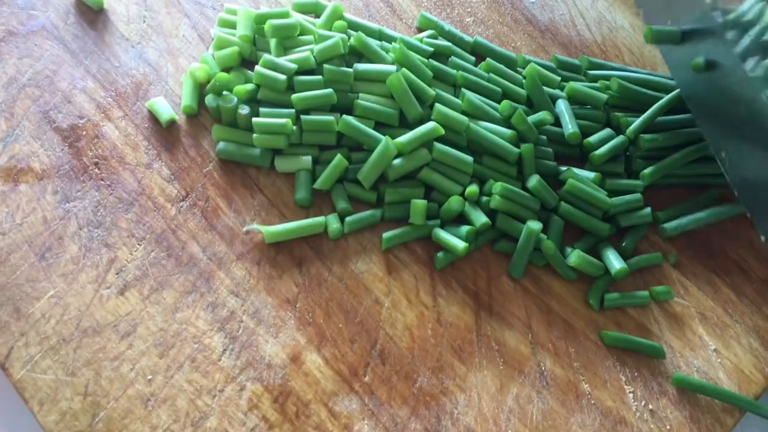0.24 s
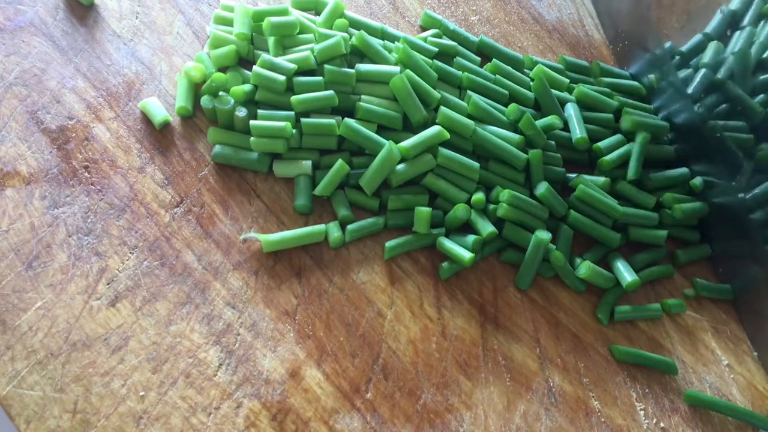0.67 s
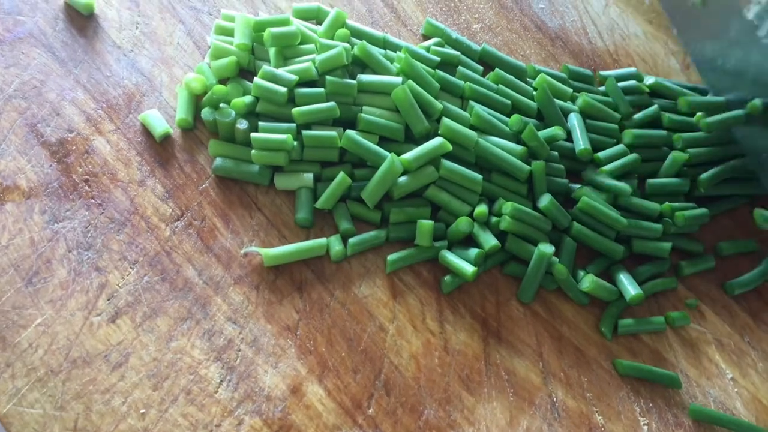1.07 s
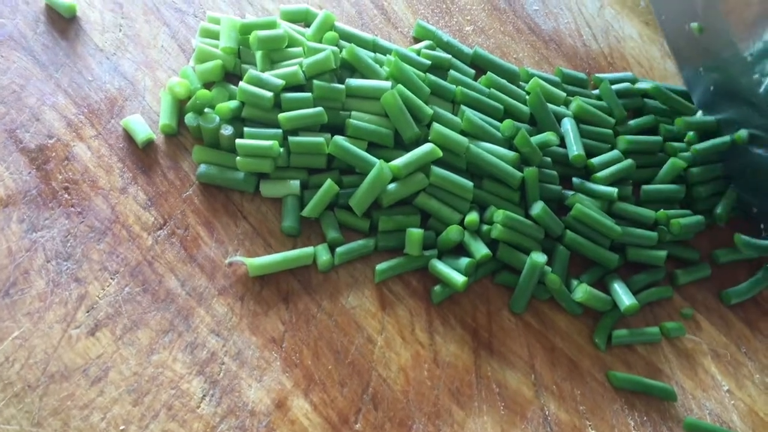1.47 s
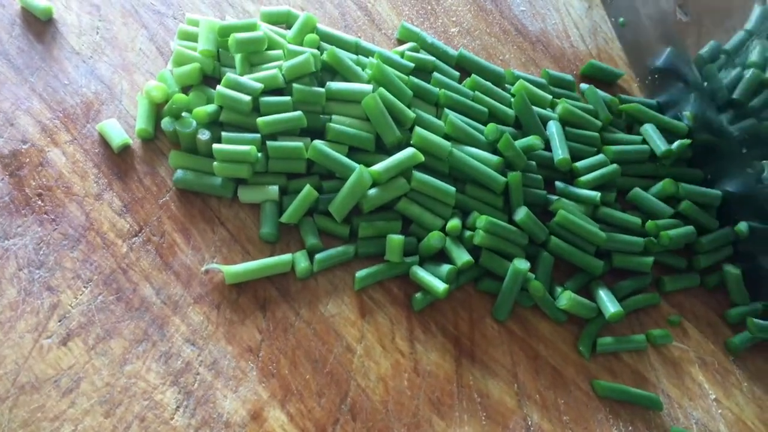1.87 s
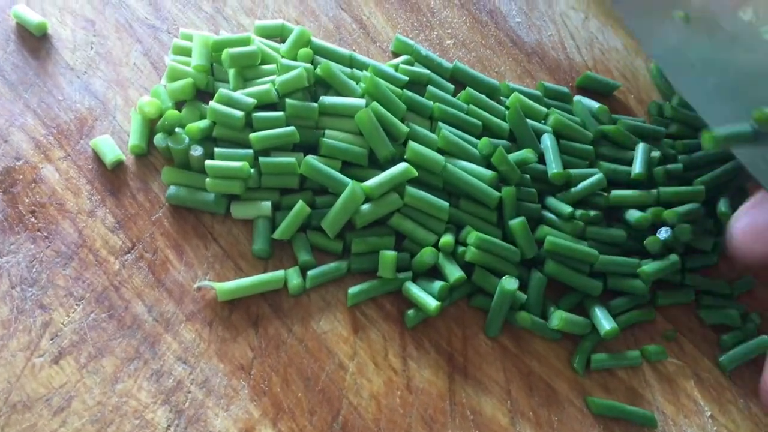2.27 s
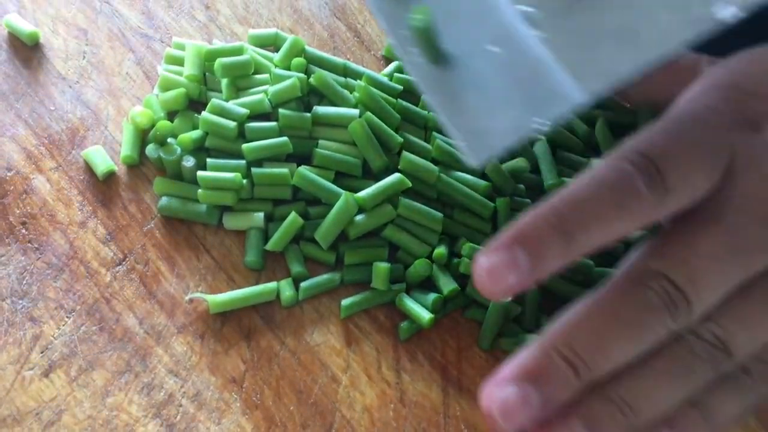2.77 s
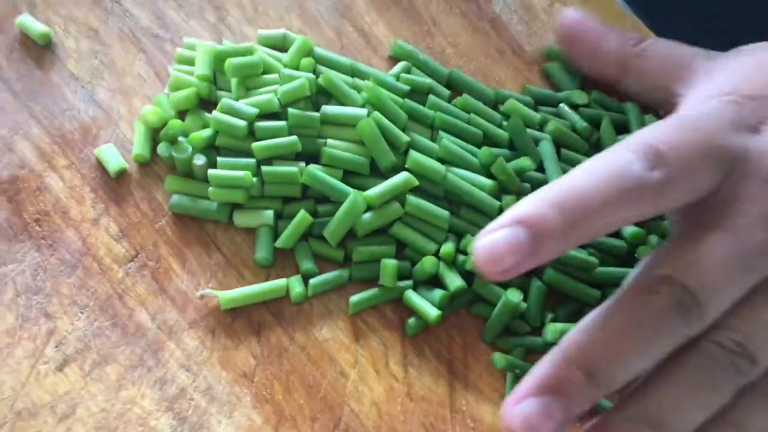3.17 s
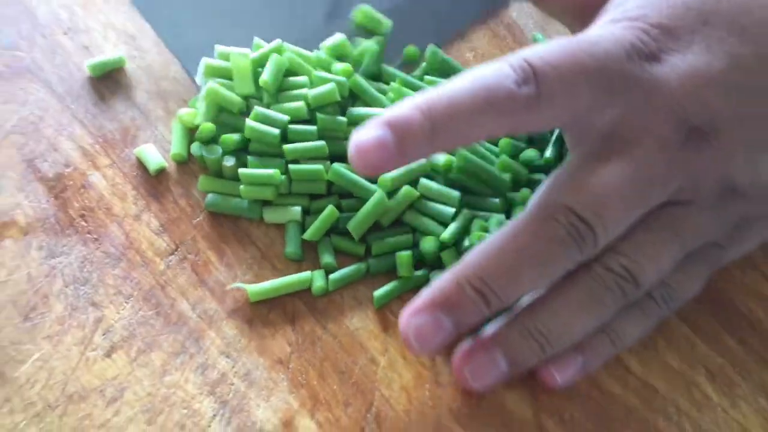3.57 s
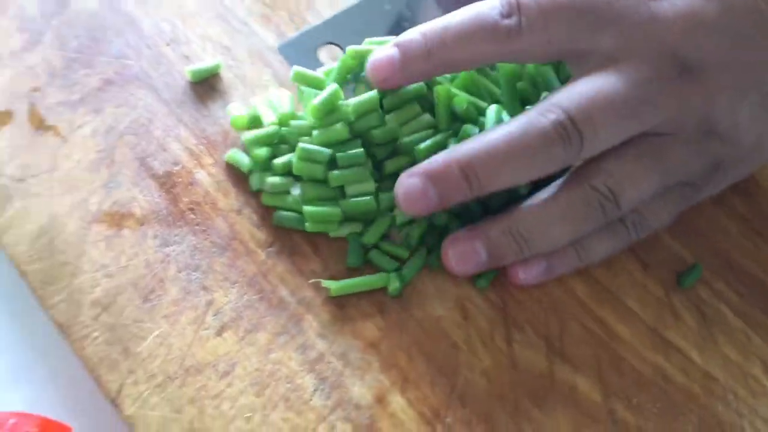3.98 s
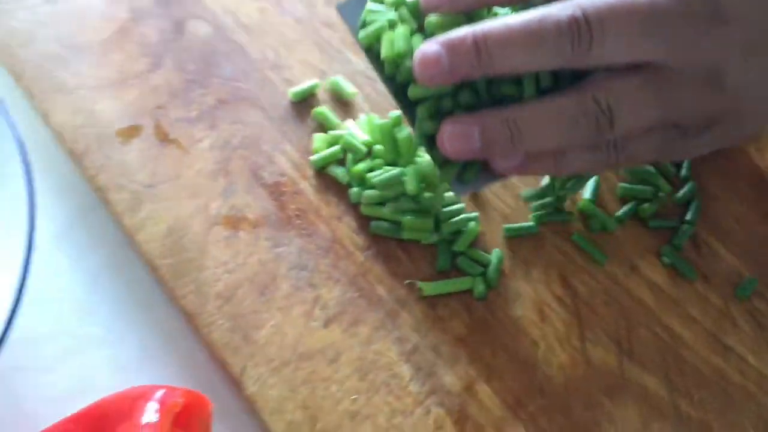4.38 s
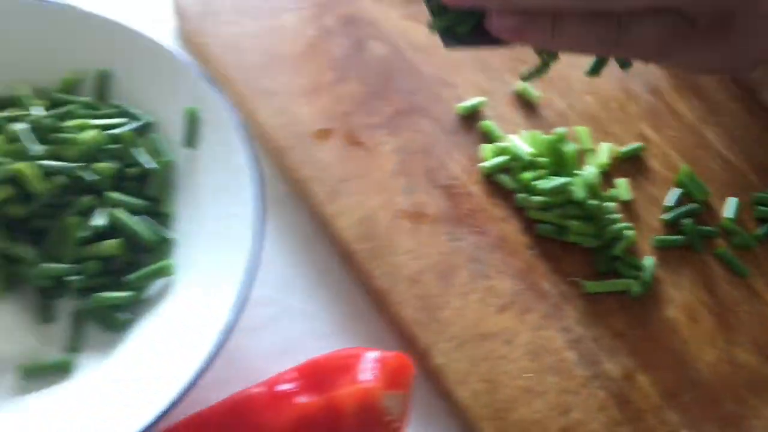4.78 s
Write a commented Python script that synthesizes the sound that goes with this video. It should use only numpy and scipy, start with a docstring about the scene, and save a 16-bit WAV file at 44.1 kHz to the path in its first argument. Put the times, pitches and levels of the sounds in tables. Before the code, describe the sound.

A knife edge rasps twice across a wooden cutting board, is set down with a knock, and rubs under chopped green stalks.

```python
"""A cleaver's edge rasps twice across a wooden board, catching as it gathers chopped green stalks.
The slips of the edge drive the steel and the wood. The blade then tings, is set down with a hollow
knock, slides flat under the heap with a hollow rub and a moist hiss, and a few pieces pat back on the
board. The microphone stands close by in a small hard-walled kitchen with low room noise: filtered
noise makes the rubbing, hiss and room, decaying sines the steel and wood, short bursts the catches."""
import sys
import numpy as np
from scipy import signal
from scipy.fft import rfft, irfft
from scipy.io import wavfile
from scipy.ndimage import map_coordinates

SR = 44100
rng = np.random.default_rng(int(sys.argv[2]) if len(sys.argv) > 2 else 0)


def wav_record(signal):
    """Record a signal, one row per channel, as 16-bit PCM in the file named by sys.argv[1]."""
    frames = np.transpose(np.atleast_2d(signal))
    bounded = np.clip(frames, -1, 1)
    # unit amplitude maps onto the largest positive 16-bit level
    quanta = np.round(bounded * 32767).astype(np.int16)
    wavfile.write(sys.argv[1], SR, quanta)


N = 221866
TIME = np.arange(N) / SR
RING = TIME[:SR // 2]  # time axis of half a second for single hits and impulse responses
TOP_HZ = 15800  # upper limit of the microphone
JOLT_HZ = 450  # brief hits at the edge ring the board only above this


def undb(db):
    """Decibels to gain."""
    return 10 ** (np.asarray(db) / 20)


def unit(x):
    """Scale to an rms of one."""
    return x / np.sqrt(np.mean(x ** 2))


def blow(x):
    """Scale a hit to an rms of one over its first 5 ms."""
    return x / np.sqrt(np.mean(x[:SR // 200] ** 2))


def colour(x, points):
    """Filter by a spectrum of (Hz, dB) points, joined by lines on a log frequency axis."""
    hz, db = np.transpose(points)
    f = np.maximum(np.arange(N // 2 + 1) * SR / N, 1)
    gain = undb(np.interp(np.log(f), np.log(hz), db))
    return irfft(rfft(x) * gain, N)


def cut(x, hz, kind, order=2):
    """Low-pass or high-pass."""
    sos = signal.butter(order, min(hz, SR / 2 - 1), kind, fs=SR, output="sos")
    return signal.sosfilt(sos, x)


def through(x, response):
    """Play x through an impulse response."""
    return signal.fftconvolve(x, response)[:N]


def scramble(x):
    """Flip signs at random: the same envelope in unrelated phase."""
    return x * rng.choice([-1, 1], N)


def add(track, s, sound):
    """Mix a sound into the track at time s."""
    i = int(s * SR)
    track[i:i + len(sound)] += sound[:N - i]


def walk(rate_hz):
    """A smooth random wander with a spread of one."""
    return unit(cut(rng.standard_normal(N), rate_hz, "low"))


def swell(s, half_s):
    """A bell-shaped rise and fall around time s."""
    return np.exp(-((TIME - s) / half_s) ** 2)


def body(modes):
    """Impulse response of (Hz, width Hz, dB) resonances: decaying sines of alternating sign."""
    out = 0
    for k, (hz, width, db) in enumerate(modes):
        level = undb(db) * 2 * np.pi * width / SR
        out = out + (-1) ** k * level * np.exp(-np.pi * width * RING) * np.sin(2 * np.pi * hz * RING)
    return out


def plate(count, width_hz):
    """Impulse response of the blade's many close, damped upper modes, loosely spaced, with unit energy."""
    stray, level, phase = rng.random((3, count))
    hz = 1500 + 14500 * (np.arange(count) + stray) / count
    short = RING[:SR // 10]
    modes = np.sin(2 * np.pi * (np.outer(hz, short) + phase[:, None]))
    ring = undb(14 * level) @ modes  # mode levels differ by up to 14 dB
    ring *= np.exp(-np.pi * width_hz * short)
    return ring / np.sqrt(np.sum(ring ** 2))


def shimmer(x, db, count, width_hz):
    """Rubbing also sets the blade's many close upper modes ringing."""
    return x + undb(db) * through(scramble(x), plate(count, width_hz))


def friction(rate, spread_db, slip_s, smooth):
    """Stick-slip: irregular slips of uneven size, each a short burst, over smooth rubbing."""
    size = undb(spread_db * np.clip(rng.standard_normal(N), -2, 2))
    slips = (rng.random(N) < rate / SR) * size ** 2  # large slips carry more power
    power = signal.lfilter([1], [1, -np.exp(-2 / (slip_s * SR))], slips)
    return unit(np.sqrt(power / power.mean() + smooth) * rng.standard_normal(N))


SHIFT_DB, SHIFT_HZ = 2.5, 22  # how much and how fast each wood resonance comes and goes
WAVER = 0.04  # strength of the wood's pitch wander, as a share of its pitch


def travelling(x, modes):
    """Resonances under a moving contact: each one comes and goes on its own, and their pitch wavers."""
    wood = np.zeros(N)
    for k, mode in enumerate(modes):
        wood += (-1) ** k * through(x, body([mode])) * undb(SHIFT_DB * walk(SHIFT_HZ))
    lag_s = WAVER * walk(SHIFT_HZ) / (2 * np.pi * SHIFT_HZ)
    return unit(map_coordinates(wood, [(TIME - lag_s) * SR], mode="mirror"))


# The empty kitchen's noise at the microphone. Each row: frequency in Hz, relative level in dB per Hz.
ROOM_NOISE_SPECTRUM = [(15, -41.5), (25, -14), (59, 2.5), (96, -8.5), (198, -2.5), (267, -8.5), (399, -14),
                       (445, -23.5), (523, -16.5), (741, -19.5), (945, -13.5), (2060, -28), (2420, -30.5),
                       (4150, -39.5), (15500, -50.5)]
KITCHEN_DB = -48  # room noise before the drift
DRIFT_DB, DRIFT_HZ = 1, 3.3  # slow wander of the room noise in the midrange


def kitchen():
    """Low room noise whose midrange slowly swells and sinks."""
    noise = undb(KITCHEN_DB) * unit(colour(rng.standard_normal(N), ROOM_NOISE_SPECTRUM))
    middle = colour(noise, [(300, -30), (800, 0), (2500, 0), (6000, -20)])
    return noise + middle * (undb(DRIFT_DB * walk(DRIFT_HZ)) - 1)


def room(x, early_db, early_s, late_db, t60_s, treble_t60_s):
    """Quick reflections from the counter, then the tail of a hard-walled kitchen, shorter in the treble."""
    noise = rng.standard_normal((3, len(RING)))
    early = undb(early_db) * unit(noise[0] * np.exp(-RING / early_s) * (RING > 0.002))
    low = cut(noise[1], 3500, "low", order=1) * np.exp(-np.log(1000) * RING / t60_s)
    high = cut(noise[2], 3700, "high", order=1) * np.exp(-np.log(1000) * RING / treble_t60_s)
    late = undb(late_db) * unit((low + high) * (RING > 0.009))
    wet = through(x, (early + late) / np.sqrt(len(RING)))
    return colour(wet, [(70, 8), (300, 6), (700, -0.5), (2000, 3.5), (6000, -6.0), (14000, -7.5)])


# Pieces dropping on the board. Each row: start in seconds, level in dB, brightness (low-pass) in Hz.
PIECE_DROPS = [(.934, -46, 983), (1.879, -47.5, 1450), (3.242, -46, 1177), (3.769, -38.5, 1080),
               (4.236, -32.5, 3900), (4.293, -40.5, 2450), (4.363, -43, 5020), (4.412, -40.5, 1200),
               (4.464, -39, 1710), (4.565, -44.5, 1830)]
# Wood under a soft piece. Each row: frequency in Hz, width in Hz, relative level in dB.
PIECE_RESONANCES = [(600, 60, 3), (905, 130, 1), (1670, 310, -3), (2720, 900, -8), (4000, 1100, -12.5)]
# Loose pieces roll and rustle on the wood. Each row: middle in seconds, level in dB, half length in seconds.
ROLLING_PIECES = [(3.753, -42.5, 0.016), (4.287, -51, 0.25)]


def drops():
    """Soft stalk pieces pat the board, each with its own brightness, and roll over it."""
    out = np.zeros(N)
    wood = body(PIECE_RESONANCES)
    for s, db, bright_hz in PIECE_DROPS:
        contact = rng.standard_normal(len(RING)) * np.exp(-RING / 0.0025)
        pat = cut(through(contact, wood), bright_hz, "low", order=3)
        add(out, s, undb(db) * blow(pat))
    patter = friction(rate=200, spread_db=2, slip_s=0.002, smooth=0.3)
    rolling = unit(cut(through(patter, wood), 1260, "low"))
    return out + rolling * sum(undb(db) * swell(s, half_s) for s, db, half_s in ROLLING_PIECES)


# Moist stalks on steel, heard close. Each row: frequency in Hz, relative level in dB per Hz.
STALK_HISS_SPECTRUM = [(700, -1), (1500, 4), (2200, -1), (2700, -1), (4500, 0.5), (9000, -4), (12000, -8),
                       (15500, -12)]
RUSTLE_DB, RUSTLE_HZ = 2, 16  # how much and how fast each band of the rustle flickers


def rustle(count):
    """Many moist stalks slip over the steel: a faintly metallic crackle whose bands flicker separately."""
    slips = friction(rate=550, spread_db=3.7, slip_s=0.0008, smooth=0.6)
    grains = rfft(shimmer(slips, db=1, count=150, width_hz=35))
    place = np.interp(np.arange(len(grains)) * SR / N, [0, TOP_HZ], [0, count - 1])
    crackle = np.zeros(N)
    for k in range(count):
        band = irfft(grains * np.maximum(1 - abs(place - k), 0), N)  # overlapping triangular bands
        crackle += band * undb(RUSTLE_DB * walk(RUSTLE_HZ))
    return unit(colour(crackle, STALK_HISS_SPECTRUM))


def shove(s, rise_s, fall_s):
    """Speed of a push that gathers up to time s and then dies away."""
    return np.exp(-np.maximum((s - TIME) / rise_s, (TIME - s) / fall_s))


# The flat blade is pushed under the heap. Each row: peak in seconds, wood level in dB,
# hiss level in dB, rise in seconds, fall in seconds.
BLADE_SHOVES = [(3.412, -30.5, -40, 0.13, 0.081), (3.78, -44, -51, 0.17, .08),
                (4.093, -45.5, -52, 0.058, 0.017)]
# Blade rubbing under the weight of the heap. Each row: frequency in Hz, width in Hz, relative level in dB.
RUBBED_WOOD_RESONANCES = [(366, 45, -5.5), (548.5, 42.5, 0.5), (637, 62, -4), (907, 75, -0.5),
                          (1080, 200, -10.5), (1470, 100, -8.5), (2150, 230, -17.5)]
# The sliding blade briefly grips and groans. Each row: middle in seconds, pitch in Hz,
# peak amplitude in dB, half length in seconds.
BLADE_GROANS = [(3.408, 535, -25, 0.017), (3.457, 320, -28.5, 0.0083), (3.456, 1460, -37.5, 0.037)]
# Stalks brush against fingers and steel. Each row: middle in seconds, level in dB, half length in seconds.
STALK_BRUSHES = [(0.37, -52, 0.014), (0.82, -67, 0.049), (1.276, -61, 0.014), (1.83, -60.5, 0.15),
                 (2.652, -61.5, 0.14), (3.203, -62, 0.037), (3.627, -57, 0.06), (4.021, -61, 0.016),
                 (4.199, -60.5, 0.037), (4.3, -66, 0.2)]
HISS_LAG_S = 0.023  # the stalks ride up the steel just after each shove


def slide():
    """The flat blade rubs the wood with a hollow note while moist stalks hiss over steel and fingers."""
    rub = friction(rate=420, spread_db=2.5, slip_s=0.002, smooth=0.9)
    wood = travelling(rub, RUBBED_WOOD_RESONANCES)
    hiss = rustle(count=12)
    out = np.zeros(N)
    for s, wood_db, hiss_db, rise_s, fall_s in BLADE_SHOVES:
        out += undb(wood_db) * wood * shove(s, rise_s, fall_s)
        out += undb(hiss_db) * hiss * shove(s + HISS_LAG_S, rise_s, fall_s)
    wobble = 0.14 * unit(cut(rub, 36, "low"))  # phase in radians
    for s, hz, db, half_s in BLADE_GROANS:
        out += undb(db) * swell(s, half_s) * np.sin(2 * np.pi * hz * TIME + wobble)
    return out + hiss * sum(undb(db) * swell(s, half_s) for s, db, half_s in STALK_BRUSHES)


# The blade is set down on the board. Each row: start in seconds, level in dB,
# change of the hollow middle modes in dB.
SET_DOWN_KNOCKS = [(3.091, -43.5, -9), (3.119, -19, -1), (3.138, -28.5, -21), (3.153, -43, -3)]
# Blade lying flat on the board. Each row: frequency in Hz, width in Hz,
# relative level in dB before the change of the middle modes.
FLAT_BLADE_RESONANCES = [(117, 12, -6), (160, 14, -4), (232, 30, 2.5), (292, 24, 1.5), (358, 24, -6),
                         (530, 38, -3), (590, 50, 1), (955, 40, -2), (1005, 36, -4), (1513, 32, -7),
                         (1640, 80, -9), (1910, 50, -17), (2160, 35, -17)]


def knocks():
    """The blade lands flat: a hollow wooden knock, a brief dull rattle and a faint steel click."""
    out = np.zeros(N)
    for s, db, hollow_db in SET_DOWN_KNOCKS:
        modes = [(hz, width, level + hollow_db * (450 < hz < 800))
                 for hz, width, level in FLAT_BLADE_RESONANCES]
        noise = rng.standard_normal(len(RING))
        dull = cut(cut(noise, 690, "low"), 154, "high", order=3)
        rattle = dull * np.exp(-RING / 0.023)
        click = cut(noise, 2000, "low", order=1) * np.exp(-RING / 0.0037)
        knock = blow(body(modes)) + undb(-19) * unit(rattle) + undb(-19) * blow(click)
        add(out, s, undb(db) * knock)
    return out


# The free blade is tapped. Each row: start in seconds, level in dB before the balance of its parts,
# ring length as a share of the free decay.
BLADE_TAPS = [(2.221, -41, 0.82), (2.248, -51.5, 0.84), (2.489, -59, 0.1), (4.189, -54, 0.6)]
# The free blade. Each row: frequency in Hz, relative level in dB, free decay by 60 dB in seconds.
FREE_BLADE_RESONANCES = [(1491, -4, .27), (2146, -9, .14), (2900, -13, .2), (3490, -7, .19),
                         (4200, -9, .16), (5216, -1, .12), (5680, -7, .09), (6282, -15, .15),
                         (7025, -10, .22), (7320, -11, .14), (8393, -7, .12), (8676, -3, .11),
                         (13450, -10, .11), (14120, -12, .12)]


def tings():
    """A light touch on the free blade: a tick, a spray of short upper modes and a few clear ones."""
    out = np.zeros(N)
    for s, db, share in BLADE_TAPS:
        ring = np.zeros(len(RING))
        for hz, level, t60_s in FREE_BLADE_RESONANCES:
            decay = np.exp(-np.log(1000) * RING / (t60_s * share))
            ring += undb(level) * decay * np.sin(2 * np.pi * (hz * RING + rng.random()))
        tick = cut(rng.standard_normal(len(RING)), 1330, "high") * np.exp(-RING / 0.0031)
        spray = plate(count=60, width_hz=24.0 / share)
        add(out, s, undb(db) * (undb(2.5) * blow(ring) + undb(4.5) * blow(tick)))
        add(out, s, undb(db + 3.5) * blow(spray))
    return out


# The board rocks on the counter as the pressure changes. Each row: start in seconds, level in dB.
BOARD_BUMPS = [(0.536, -35), (.611, -23), (0.677, -39), (0.814, -40), (1.389, -34), (1.562, -28),
               (1.674, -29.5)]


def bumps():
    """The heavy board thuds softly on the counter: one low damped resonance."""
    out = np.zeros(N)
    thud = blow(cut(body([(88.5, 37, 0)]), 200, "low"))
    for s, db in BOARD_BUMPS:
        add(out, s, undb(db) * thud)
    return out


# Steel edge pressed on wood. Each row: frequency in Hz, width in Hz, relative level in dB.
PRESSED_EDGE_RESONANCES = [(2350, 93, 6), (3770, 260, 3), (5550, 260, 2), (9260, 350, -1.5)]


def steel(x):
    """The edge's vibration plus the damped resonances of the pressed blade, driven in unrelated phase."""
    return x + through(scramble(x), body(PRESSED_EDGE_RESONANCES))


def snap(length_s):
    """A short noise burst with an even spectrum."""
    t = RING[:2048]
    shape = np.exp(-(t / length_s) ** 2)
    phase = np.angle(rfft(shape * rng.standard_normal(len(t))))
    even = irfft(np.exp(1j * phase))
    burst = even * np.exp(-(t / (2 * length_s)) ** 2)
    return unit(burst) * np.sqrt(np.mean(shape ** 2))


# The edge catches on the wood or snaps past a stalk. Each row: start in seconds,
# level in dB before steel and board answer, length in seconds.
EDGE_CATCHES = [(0.404, -35.5, 0.0025), (0.481, -17, 0.0019), (0.4853, -15.5, 0.0019),
                (0.516, -18.5, 0.0021), (0.525, -20.5, .0018), (0.54, -28, 0.0017), (0.563, -29, .002),
                (.569, -21.5, 0.002), (0.58, -18.5, .002), (0.592, -27, 0.0017), (.5967, -10.5, 0.0023),
                (0.599, -16.5, 0.0021), (.801, -48.5, 0.0017), (1.364, -40.5, .003), (1.375, -37.5, 0.0036),
                (1.389, -39, 0.0021), (1.398, -34, .0016), (1.408, -25.5, .0013), (1.442, -32.5, 0.0022),
                (1.483, -34, .0026), (1.5257, -18, 0.0012), (1.5314, -7, .0023), (1.5377, -11, 0.00074),
                (1.55, -15.5, 0.0016), (1.5696, -16.5, 0.0022), (1.576, -20, .0013), (1.596, -28, .0013),
                (1.617, -20.5, 0.0042), (1.626, -16.5, 0.0024), (1.647, -25, 0.0022),
                (1.6631, -13.5, .0036), (1.8194, -48, 0.0031), (1.884, -52, .002), (4.0851, -43.5, 0.0023),
                (4.365, -48, 0.0014)]
# Tone of the catches close by. Each row: frequency in Hz, gain in dB.
CATCH_SPECTRUM = [(300, -6.5), (1500, -6.5), (4000, -3.5), (6500, 2), (9500, 3), (11000, -1), (15500, -5)]
# The board under the edge, in catches and sweeps. Each row: frequency in Hz, width in Hz,
# relative level in dB.
BOARD_RESONANCES = [(80, 26, 5.5), (108, 26, 0), (156, 26, -3), (310, 70, -5), (570, 80, -2), (655, 85, 2),
                    (740, 100, -5), (1000, 200, -13)]


def catches():
    """Hard slips and snaps at the edge: bright bursts, so brief that they stir only upper board modes."""
    snaps = np.zeros(N)
    for s, db, length_s in EDGE_CATCHES:
        add(snaps, s, undb(db) * snap(length_s))
    bright = colour(steel(snaps), CATCH_SPECTRUM)
    board = cut(through(snaps, body(BOARD_RESONANCES)), JOLT_HZ, "high", order=3)
    return undb(-0.5) * bright + undb(2) * board


BITE_S, EASE_S, LIFT_S = 0.039, 0.026, 0.0061  # time to build pressure, to relax it, to leave the wood


def pressure(stroke, skim_db, eased_db):
    """Gain of one stroke: light skim, rise to full pressure, hold, lighter finish and lift."""
    lands, bites, eases, lifts = stroke
    corners = [bites - BITE_S, bites, eases, eases + EASE_S]
    db = np.interp(TIME, corners, [skim_db, 0, 0, eased_db])
    return undb(db) * (TIME >= lands) * np.exp(-np.maximum(TIME - lifts, 0) / LIFT_S)


# The edge crosses the board close to the microphone. Each row: landing, bite, easing and lift in seconds,
# rasp and board levels at full pressure in dB, singing steel in Hz,
# rasp of the lighter finish in dB against full pressure.
EDGE_STROKES = [(0.399, 0.476, 0.5564, .604, -28.5, -28, 3700, -5),
                (1.367, 1.527, 1.572, 1.672, -25.5, -24, 9300, -10)]
# Rasp of edge on wood. Each row: frequency in Hz, relative level in dB per Hz.
RASP_SPECTRUM = [(400, -6), (900, -8), (1900, -4.5), (3000, 0), (5000, -1), (6400, 3), (7700, -3.5),
                 (9700, 0), (10600, -4), (13000, -3), (15500, -8.5)]
# Before the bite and in the lighter finish, against full pressure.
SKIM_DB, BOARD_SKIM_DB, BOARD_EASED_DB = -23.5, -18.5, -13.5
SING_DB, SING_WIDTH_HZ = -5, 400  # the singing steel resonance, against the rasp
# The board as the edge lands and as it springs free at full tension, against its full-pressure level.
TAP_DB, RELEASE_DB = -16, 0.5


def sweeps():
    """The edge chatters over the grain; the same slips ring the steel and shake the board,
    which also rings at landing and lift."""
    slips = friction(rate=950, spread_db=3.4, slip_s=0.0005, smooth=0.3)
    ringing = shimmer(slips, db=-2, count=90, width_hz=70)
    rasp = unit(colour(steel(ringing), RASP_SPECTRUM))
    board = travelling(slips, BOARD_RESONANCES)
    tap = blow(cut(body(BOARD_RESONANCES), JOLT_HZ, "high"))
    out = np.zeros(N)
    for *stroke, rasp_db, board_db, sing_hz, eased_db in EDGE_STROKES:
        force = pressure(stroke, SKIM_DB, eased_db)
        board_force = pressure(stroke, BOARD_SKIM_DB, BOARD_EASED_DB)
        sing = unit(through(scramble(slips), body([(sing_hz, SING_WIDTH_HZ, 0)])))
        # force counts twice for the singing, so it stands out only under full pressure
        out += undb(rasp_db) * force * (rasp + undb(SING_DB) * force * sing)
        out += undb(board_db) * board_force * board
        lands, _, eases, lifts = stroke
        add(out, lands, undb(board_db + TAP_DB) * tap)
        tension = min(1, (2 * EASE_S / (lifts - eases)) ** 2)  # a long light finish leaves little to spring free
        add(out, lifts, undb(board_db + RELEASE_DB) * tension * tap)
    return out


def scene():
    """All the handling at the board, in its room."""
    near = drops() + slide() + knocks() + tings() + bumps() + catches() + sweeps()
    wet = room(near, early_db=-11, early_s=0.021, late_db=-13.5, t60_s=0.45, treble_t60_s=0.34)
    return (near + wet + kitchen())[None]


def record(dry):
    """The microphone sheds the deepest bass, has a narrow treble dip, and the top is cut."""
    notched = signal.lfilter(*signal.iirnotch(10430, 42, fs=SR), dry)  # centre in Hz, Q
    heard = 0.5 * notched + 0.5 * dry  # half the notch leaves a 6 dB dip
    heard = cut(heard, 50, "high", order=3)
    top = signal.ellip(10, 0.2, 70, TOP_HZ, fs=SR, output="sos")
    return signal.sosfilt(top, heard)


dry = scene()
out = record(dry)
wav_record(out)
```